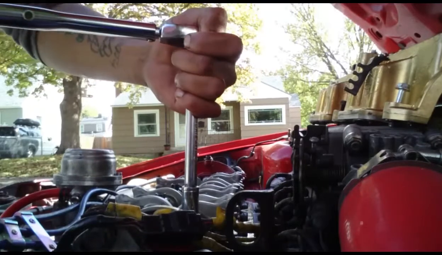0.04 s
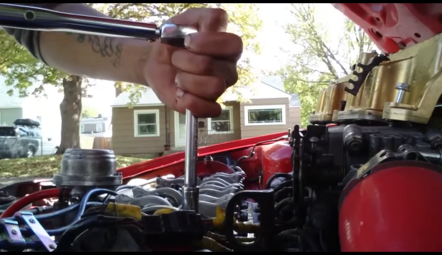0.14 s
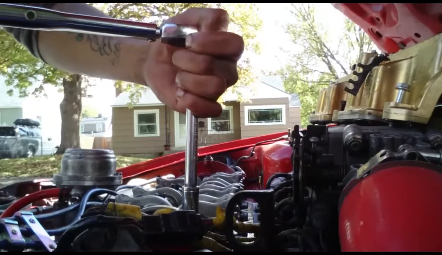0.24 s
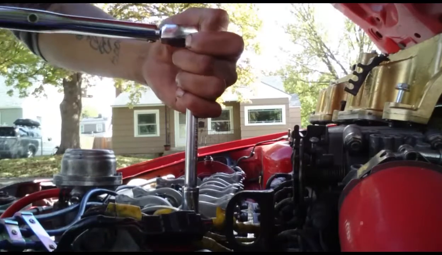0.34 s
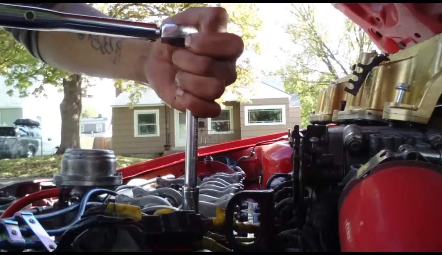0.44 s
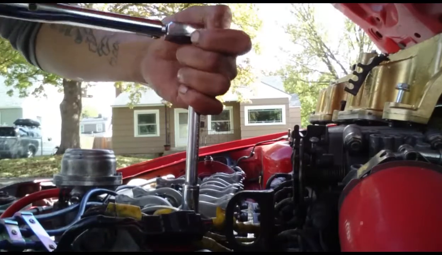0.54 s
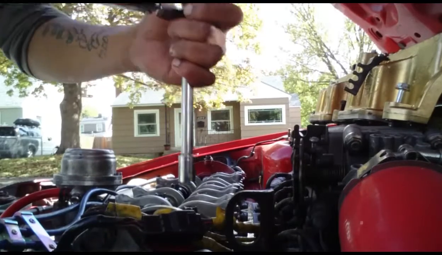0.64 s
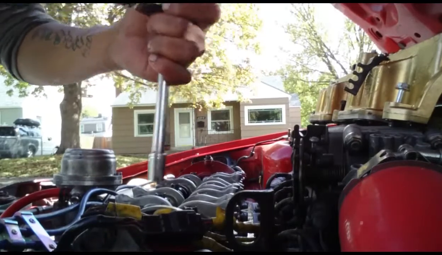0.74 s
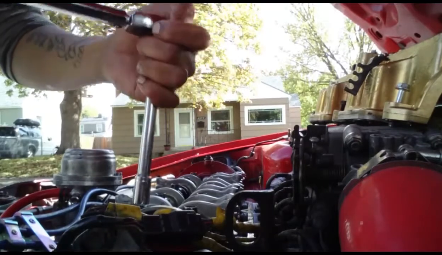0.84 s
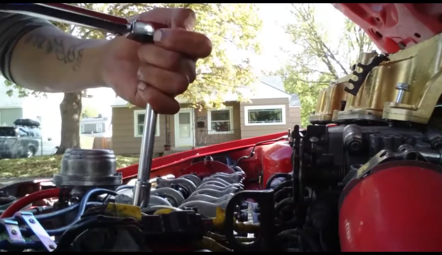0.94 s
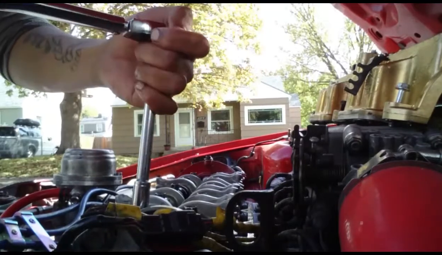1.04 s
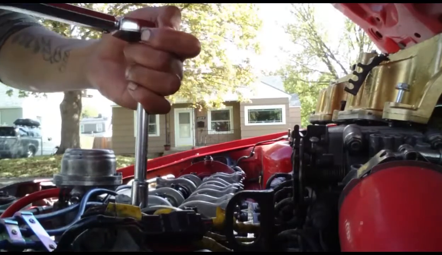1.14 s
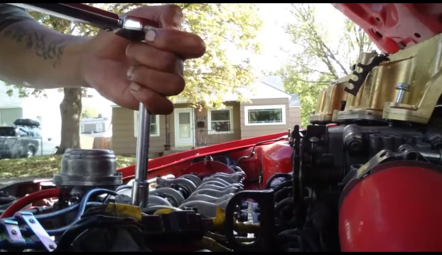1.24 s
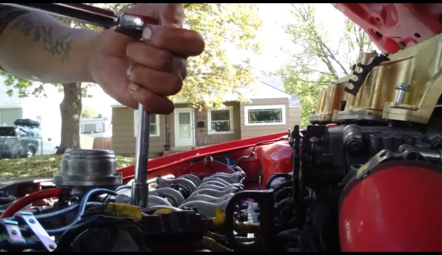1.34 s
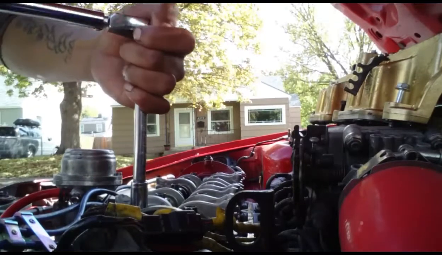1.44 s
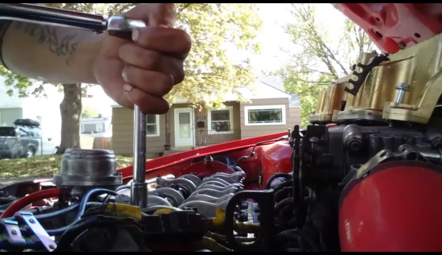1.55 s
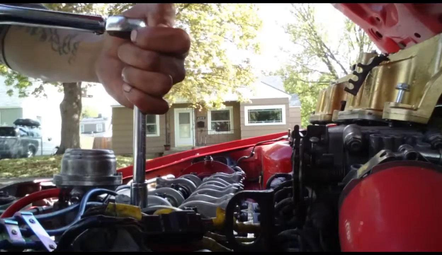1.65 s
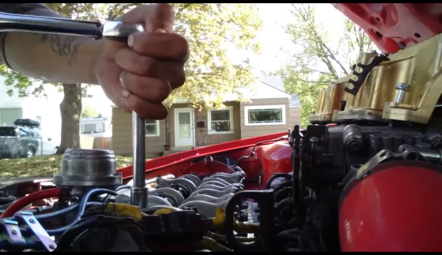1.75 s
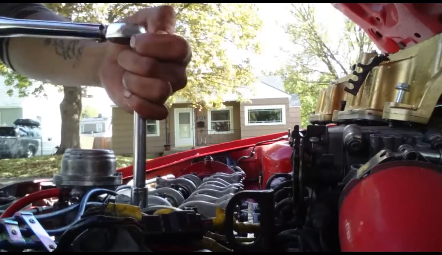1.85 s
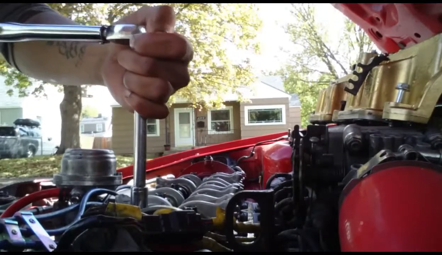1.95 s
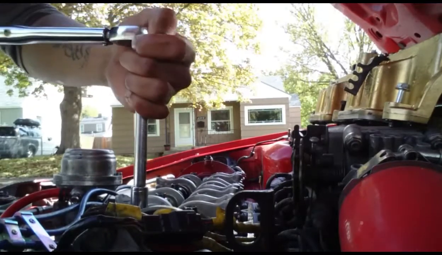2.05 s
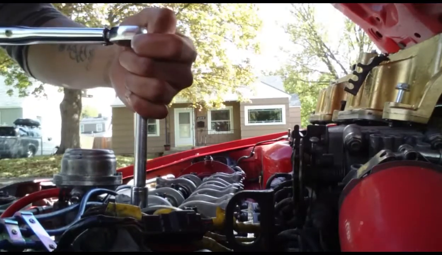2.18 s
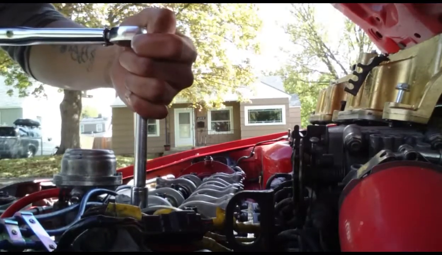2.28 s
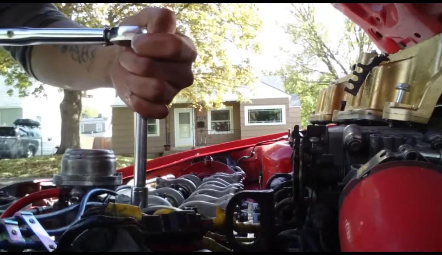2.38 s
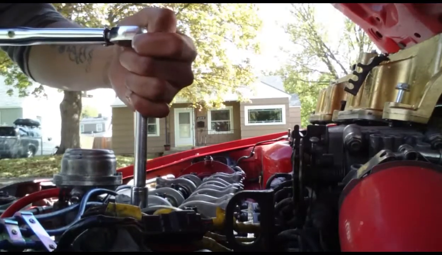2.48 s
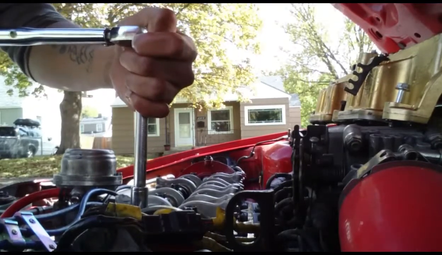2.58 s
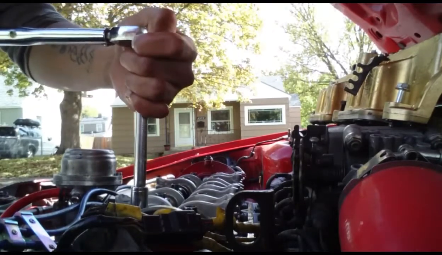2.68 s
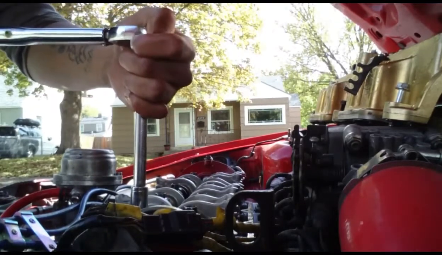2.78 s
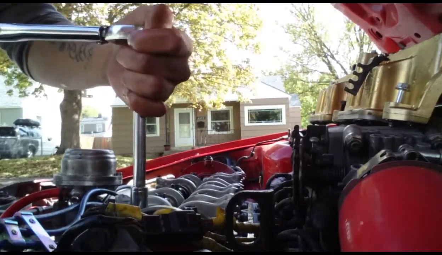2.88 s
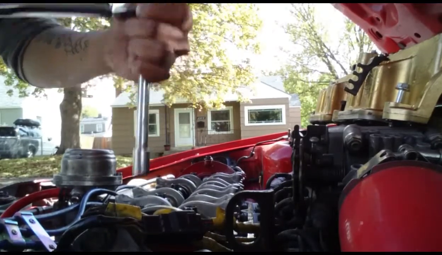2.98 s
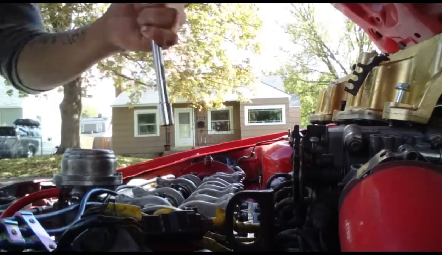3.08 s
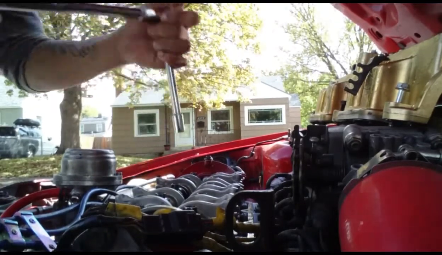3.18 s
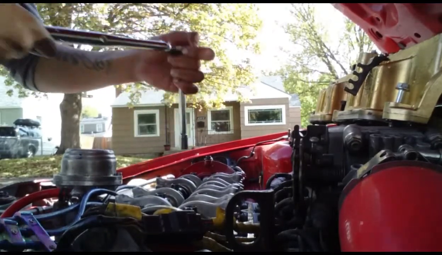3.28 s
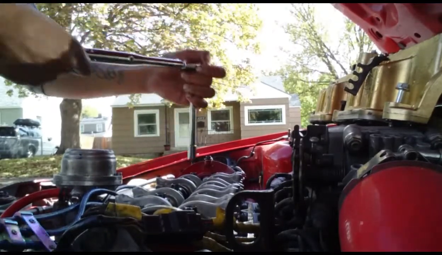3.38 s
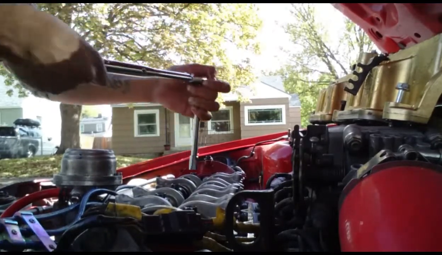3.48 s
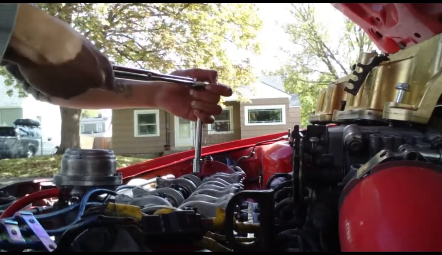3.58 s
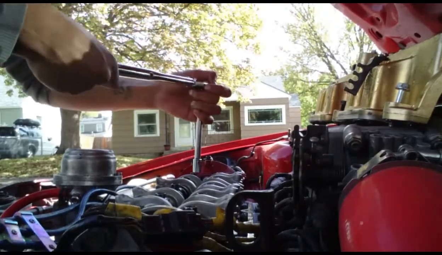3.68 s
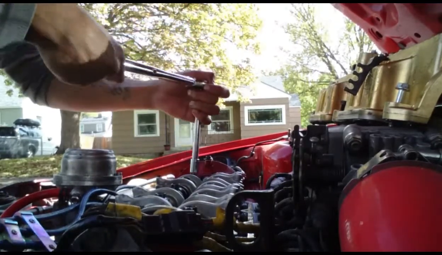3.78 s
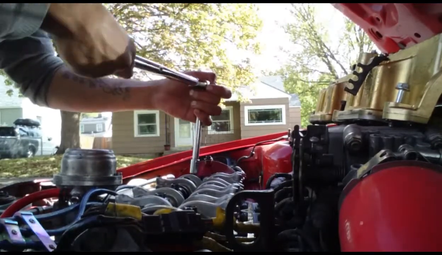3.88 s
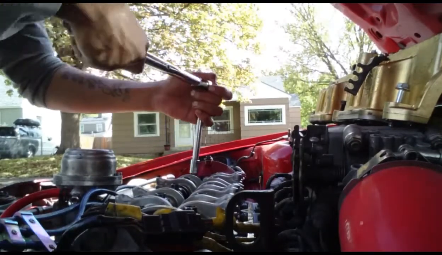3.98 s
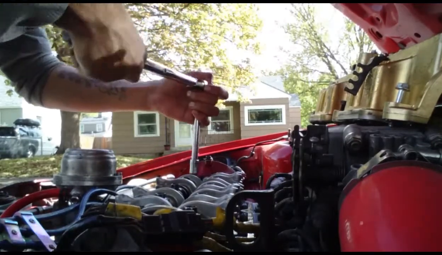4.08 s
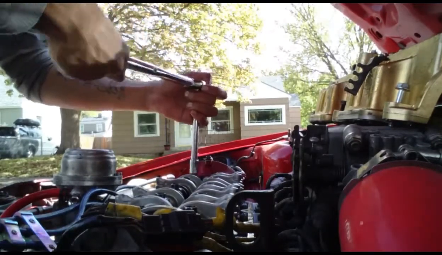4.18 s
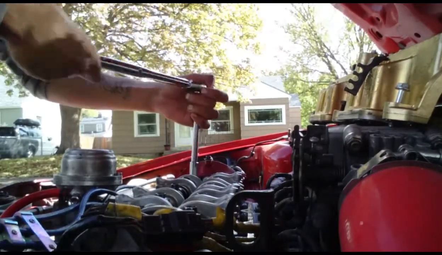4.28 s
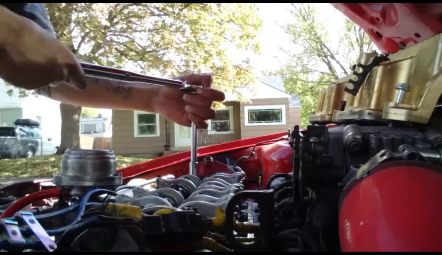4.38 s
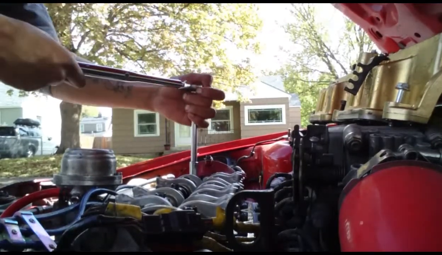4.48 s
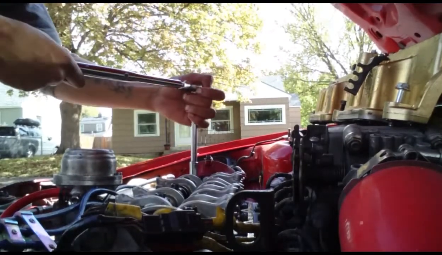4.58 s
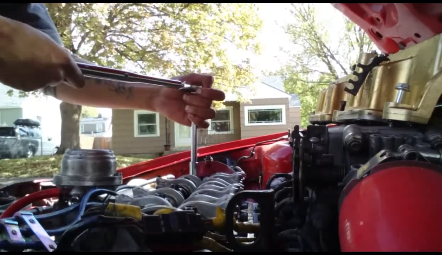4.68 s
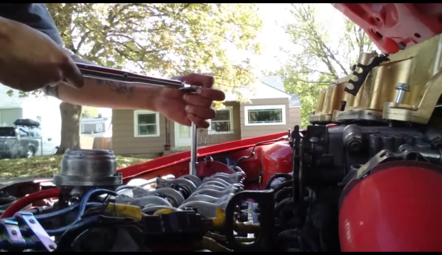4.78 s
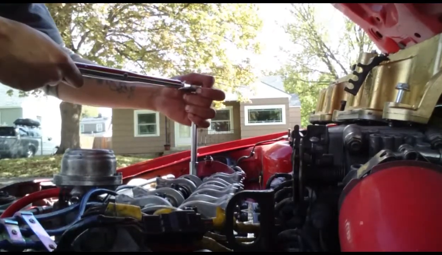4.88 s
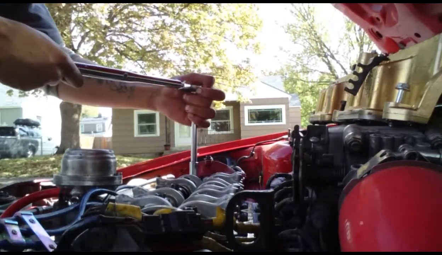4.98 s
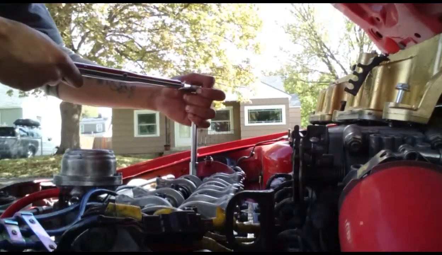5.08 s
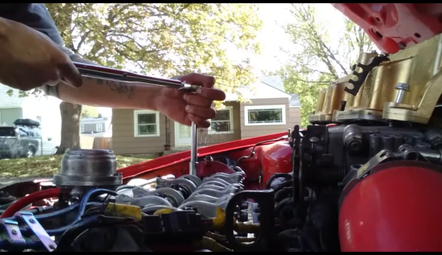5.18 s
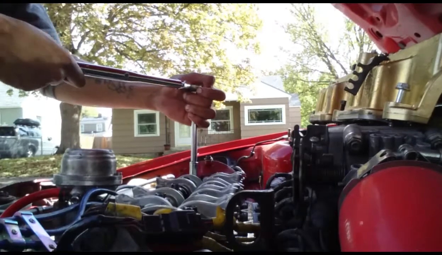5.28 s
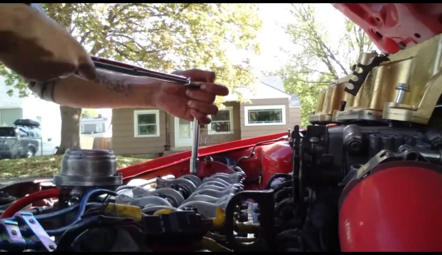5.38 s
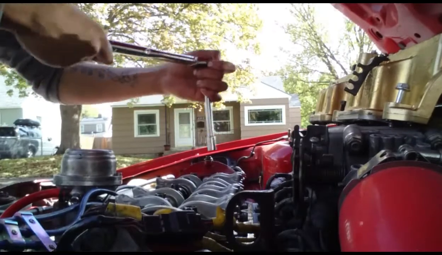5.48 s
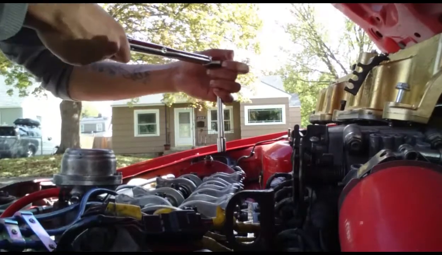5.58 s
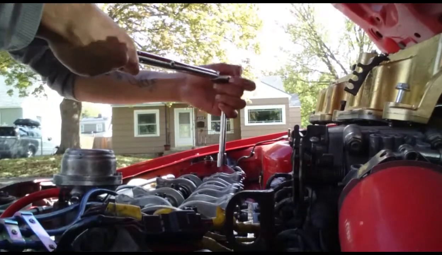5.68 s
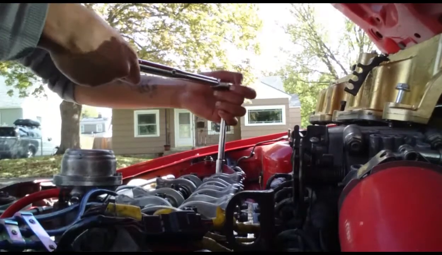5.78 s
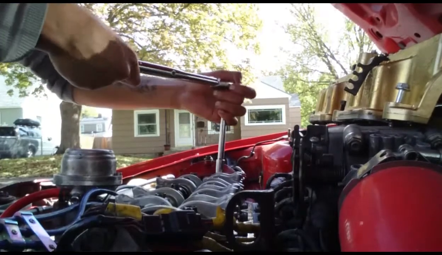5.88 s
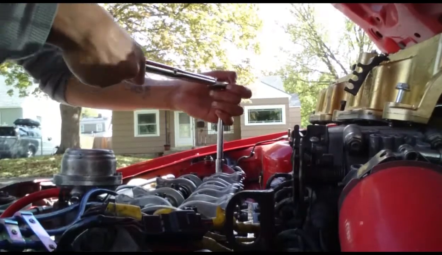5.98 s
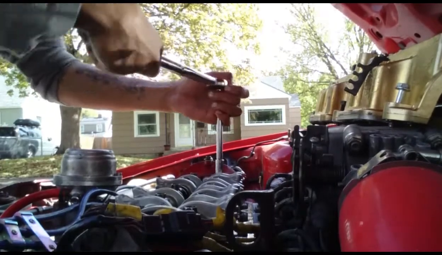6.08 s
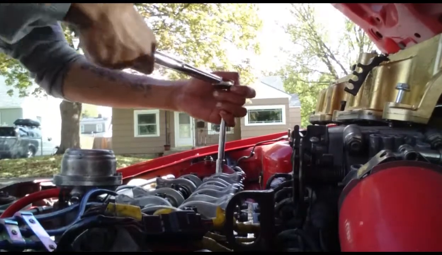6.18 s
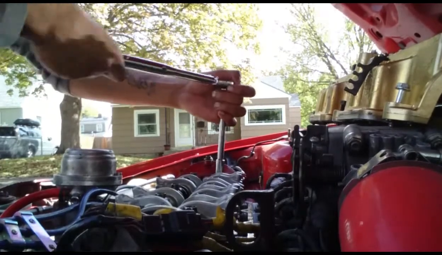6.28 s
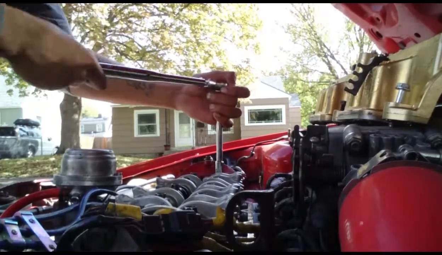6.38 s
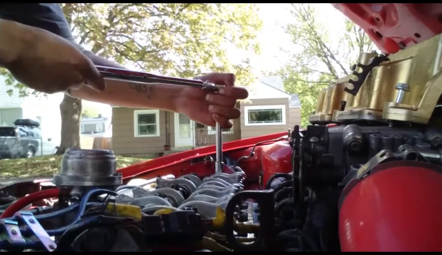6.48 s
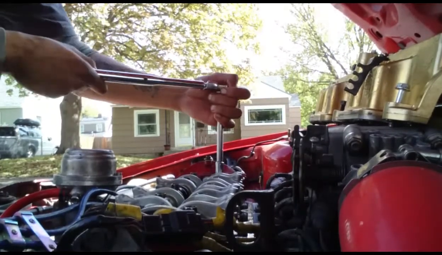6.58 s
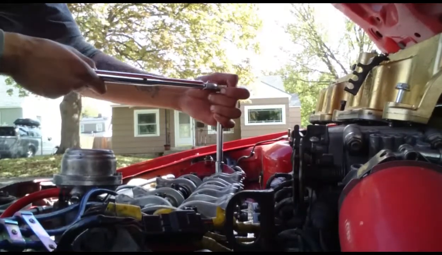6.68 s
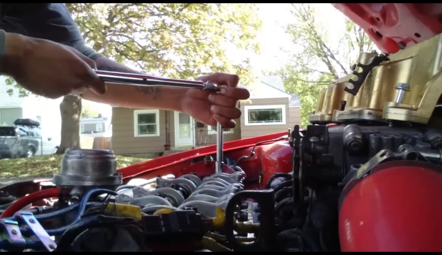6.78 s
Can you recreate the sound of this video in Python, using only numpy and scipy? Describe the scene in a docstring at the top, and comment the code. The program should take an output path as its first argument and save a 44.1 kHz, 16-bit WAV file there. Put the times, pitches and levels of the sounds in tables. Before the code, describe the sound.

Close stereo sound at an open engine bay outdoors, over a quiet bed of steady air and leaves, low rumble, faint hiss and distant traffic that swells gently around 1.3 and 3.7 seconds, then fades. At 0.3 a torque wrench breaks over with the loudest click, hard and bright with a short low thump, and snaps back at 0.5. Tiny loose ticks follow at 0.6; the socket knocks lightly at 0.95 and, duller, at 1.75. A second click pair comes at 2.6 and 2.85, the first with a brief socket ring, then small ticks. Knocks at 3.6 and 3.95 lead to a strong, sharp one at 4.3 with ringing bar. The third pair, somewhat softer, lands at 5.2 and 5.35, the last ringing clearer around the bar's pitch. Faint ticks, a knock at 5.8 and barely audible touches until 6.5 finish it, ending near 6.8.

```python
"""Under the open hood of a car parked outdoors, head bolts are tightened with a click-type torque wrench.
The wrench breaks over and snaps back, the socket knocks onto the next bolt and loose parts tick.
Each steel contact is a burst of shaped noise that scatters round the engine bay, plus decaying sines for
the extension bar and the socket; short low thumps, also decaying sines, lie under some blows.
Behind it, coloured noises make distant traffic, rumble, steady air and leaves, and microphone hiss."""
import sys
import numpy as np
from scipy import signal
from scipy.fft import rfft, irfft
from scipy.io import wavfile
from scipy.ndimage import uniform_filter1d

SR = 44100
rng = np.random.default_rng(int(sys.argv[2]) if len(sys.argv) > 2 else 0)


def wav_out(sig):
    """Save sig, one row per channel (or a flat mono array), as 16-bit PCM at SR to the path in sys.argv[1]."""
    wavfile.write(sys.argv[1], SR, np.round(np.clip(np.atleast_2d(sig).T, -1, 1) * 32767).astype(np.int16))


N = 301624   # length of the scene in samples
SPAN = 2 ** 15   # samples that one contact lasts
AGE = np.arange(SPAN) / SR   # seconds since the contact
BINS = np.fft.rfftfreq(SPAN, 1 / SR)   # Hz


def from_db(db):
    """Decibels to gain."""
    return 10 ** (np.asarray(db) / 20)


def rms_one(x):
    """Scale to unit rms."""
    return x / np.sqrt(np.mean(x ** 2) + 1e-20)


def at_hz(points, hz):
    """Read every column of a spectrum on a log-frequency axis."""
    knots, *columns = np.transpose(points)
    return np.array([np.interp(np.log(hz + 1), np.log(knots), column) for column in columns])


def fade(t60, hold=0):
    """Full strength while held, then an exponential decay of 60 dB in t60 seconds."""
    return np.exp(-np.log(1000) * np.maximum(AGE - hold, 0) / t60)


def add(out, s, sound):
    """Mix a sound in at time s."""
    start = max(round(s * SR), 0)
    out[:, start:start + SPAN] += sound[..., :N - start]


def pair(mid, side, likeness):
    """Left and right signals that are alike to the given degree (1 same, 0 unrelated, -1 opposite)."""
    c = np.clip(likeness, -.99, .99)
    shared = np.sqrt((1 + c) / 2) * mid
    opposed = np.sqrt((1 - c) / 2) * side
    return shared + opposed * np.array([[1], [-1]])


# Stereo tilt of the outdoors. Each row: frequency in Hz, left minus right in dB.
AIR_BALANCE = [(60, -8), (180, -1), (520, -7), (1520, -1.5), (4480, -0.5), (13200, -15)]
# Stereo width of the outdoors. Each row: frequency in Hz, left-right likeness from -1 to 1.
AIR_LIKENESS = [(60, 1), (180, 0.41), (520, 0.26), (1520, -0.18), (4480, 0.19), (13200, -0.1)]


def ambient(spectrum):
    """Steady stereo noise of the given colour, most alike in the bass; rms 1."""
    hz = np.fft.rfftfreq(N, 1 / SR)
    both = pair(*rfft(rng.standard_normal((2, N))), at_hz(AIR_LIKENESS, hz))
    colour_db = at_hz(spectrum, hz) + at_hz(AIR_BALANCE, hz) * np.array([[.5], [-.5]])
    return rms_one(irfft(both * from_db(colour_db), N))


def swelling(curve, colour):
    """Ambient noise of one colour that follows a level curve."""
    level_db = np.interp(np.arange(N) / SR, *np.transpose(curve))
    return from_db(level_db) * ambient(colour)


# Swell of the distant traffic. Each row: time in seconds, level in dB before the trim.
TRAFFIC = [(0.0, -72), (1.33, -62), (2.57, -68), (2.74, -64), (3.73, -61.5), (4.53, -64.5), (5.01, -74),
           (5.31, -68.5), (6.84, -81.5)]
# Colour of the traffic. Each row: frequency in Hz, relative level in dB.
TRAFFIC_COLOUR = [(200, -15.5), (400, -9), (600, -2), (1000, 0), (1400, -6.5), (2500, -14.5), (5000, -30.5)]
# Swell of the outdoor rumble. Each row: time in seconds, level in dB before the trim.
RUMBLE = [(0, -62.5), (0.5, -62), (1.5, -63), (2.8, -59), (3.3, -62), (6.84, -66)]
# Colour of the rumble. Each row: frequency in Hz, relative level in dB.
RUMBLE_COLOUR = [(25, -29), (36, -22.5), (52, -7.5), (70, 0), (100, -4), (160, -9.5), (260, -15.5),
                 (450, -26), (1500, -47)]
# Level of the hiss, which rises after the loud clicks and sinks again.
# Each row: time in seconds, level in dB before the trim.
HISS = [(0.0, -76), (0.36, -77), (0.48, -67.5), (1.2, -76.5), (2.65, -78.5), (2.78, -73.5), (5.18, -77),
        (5.33, -73), (6.84, -77.5)]
# Colour of the hiss. Each row: frequency in Hz, relative level in dB.
HISS_COLOUR = [(4000, -26), (7500, -16.5), (9500, 3), (11500, 7), (13000, -7.5)]
# Colour of the steady air and leaves. Each row: frequency in Hz, relative level in dB.
AIR = [(100, -7), (420, -1.5), (1000, 1), (1500, -1), (3600, -2.5), (5500, -11), (7500, -20.5),
       (13000, -29)]
AIR_DB = -65   # rms level of the steady air


def neighbourhood(traffic_db=-1, rumble_db=0, hiss_db=3.5):
    """Far traffic and rumble swell over steady air; a faint hiss rises after the loud clicks and sinks again."""
    traffic = from_db(traffic_db) * swelling(TRAFFIC, TRAFFIC_COLOUR)
    rumble = from_db(rumble_db) * swelling(RUMBLE, RUMBLE_COLOUR)
    hiss = from_db(hiss_db) * swelling(HISS, HISS_COLOUR)
    air = from_db(AIR_DB) * ambient(AIR)
    return traffic + rumble + hiss + air


# Short low thumps under some blows, one decaying sine to a row.
# Each row: start in seconds, level in dB before the stereo balance, frequency in Hz, t60 in seconds.
THUMPS = [(.319, -36, 98, 0.16), (0.317, -26, 130, 0.072), (.319, -23.5, 240, 0.023),
          (.319, -19, 400, 0.019), (0.317, -19.5, 534.5, .025), (.319, -22, 799.7, 0.023),
          (1.765, -36.5, 617, 0.031), (2.629, -48, 102.5, 0.13), (2.6, -47, 55, 0.32),
          (4.34, -51, 178, 0.36), (5.862, -50.5, 730, 0.1)]


def low_thumps(left_db=-12, right_db=3, rise_s=0.00036):
    """Short low thumps under some blows, heaviest at the first click and mostly on the right."""
    out = np.zeros((2, N))
    for s, db, hz, t60 in THUMPS:
        envelope = fade(t60) * (1 - np.exp(-AGE / rise_s))
        add(out, s, from_db(db) * envelope * np.sin(2 * np.pi * hz * AGE))
    return out * from_db([[left_db], [right_db]])


def coloured(x, gain):
    """Causal (minimum-phase) filter with the given gain at each frequency."""
    cepstrum = irfft(np.log(gain + 1e-9))
    # folding the cepstrum forward in time makes the filter causal
    cepstrum[..., 1:SPAN // 2] *= 2
    cepstrum[..., SPAN // 2 + 1:] = 0
    return irfft(rfft(x) * np.exp(rfft(cepstrum)))


def scatter(likeness):
    """The dense reflections of the engine bay, as stereo noise."""
    return pair(*rng.standard_normal((2, SPAN)), likeness)


# Short-lived resonances of the hand-damped wrench head.
# Each row: frequency in Hz, width in Hz, peak height in dB before the spread from blow to blow.
HEAD = [(2710, 70, 5), (2950, 80, 5), (3450, 60, 7), (3700, 70, 4), (3980, 70, 6), (4160, 70, 5),
        (4375, 60, 7), (4650, 60, 6), (5115, 65, 7), (6770, 70, 6), (7610, 65, 8), (8730, 55, 6),
        (8990, 60, 6), (10035, 55, 7), (10445, 60, 7), (11990, 90, 6)]


def head_db(spread=0.13):
    """The resonance peaks of the wrench head; each blow excites them in its own proportions."""
    total_db = 0
    for hz, width, db in HEAD:
        height_db = db * (1 + spread * rng.standard_normal())
        total_db = total_db + height_db / (1 + (2 * (BINS - hz) / width) ** 2)
    return total_db


def ripple_db(depth_db=1.67, size=70):
    """Reflections among the engine parts, as a smooth random ripple along each blow's spectrum."""
    ripple = rng.standard_normal(len(BINS))
    for _ in range(2):
        ripple = uniform_filter1d(ripple, size=size)
    return depth_db * rms_one(ripple)


# Colour of a contact at the two microphones.
# Each row: frequency in Hz, left relative level in dB, right relative level in dB.
STEEL = [(100, -39.5, -31), (412.4, -30.5, -27.5), (750, -36, -26), (1181, -17.5, -28),
         (2120, -20.5, -26.5), (3130, -19.5, -21), (3630, -15.5, -23), (4040, -10, -26), (4690, -15, -24.5),
         (6820, -28, -29.5), (8600, -23.5, -24), (9900, -25.5, -20), (11400, -24.5, -16.5),
         (13000, -33.5, -23)]
# How a contact builds and dies in each band.
# Each row: low edge in Hz, high edge in Hz, crack offset in dB, rise constant in seconds,
# t60 of the chatter in seconds, echo offset in dB.
BANDS = [(20, 980, -3, 0.0026, 0.07, 10), (909.7, 2000, -5.5, 0.0045, 0.062, 3),
         (2012, 3200, 3, .0007, 0.052, 4), (3740, 7900, 1, .0006, 0.049, -5),
         (6300, 35000, 1, 0.0012, 0.032, -9)]


def contact(chatter_s, first_db, bass_db, treble_db, bay_db, crack_t60=0.0075, bay_t60=0.35,
            bass_hz=1700, treble_hz=6000, grain_db=2, left_lead_s=.00033):
    """A hard crack, a few milliseconds of steel chattering on steel, then the dying scatter of the engine bay."""
    wander = rms_one(uniform_filter1d(rng.standard_normal(SPAN), size=50))
    grain = from_db(grain_db * wander)   # the chatter is uneven in strength
    noises = rfft([scatter(likeness=0.56), scatter(likeness=.2)])
    blow = 0
    for low_hz, high_hz, crack_db, rise_s, t60, echo_db in BANDS:   # the chatter lasts longer in the lows
        too_high = 1 + (BINS / high_hz) ** 10
        too_low = 1 + (low_hz / (BINS + 1)) ** 10
        near, far = irfft(noises / np.sqrt(too_high * too_low))
        crack = from_db(first_db + crack_db) * fade(crack_t60)
        chatter = grain * fade(t60, chatter_s)
        bay = far * from_db(bay_db + echo_db) * fade(bay_t60)
        blow = blow + (near * (crack + chatter) + bay) * (1 - np.exp(-AGE / rise_s))
    blow[1] = np.interp(AGE - left_lead_s, AGE, blow[1], left=0)   # the right microphone is farther away
    bass_shelf = bass_db / (1 + (BINS / bass_hz) ** 4)
    treble_shelf = treble_db * (1 - 1 / (1 + (BINS / treble_hz) ** 8))
    colour_db = at_hz(STEEL, BINS) + bass_shelf + treble_shelf + head_db() + ripple_db()
    return rms_one(coloured(blow, from_db(colour_db)))


def ring(modes, spread_db, phase_spread=0.94):
    """Struck steel: every blow shares its force differently among the modes, and each mode radiates its own way."""
    out = 0
    for hz, db, t60, pan_db in modes:
        phase = phase_spread * rng.standard_normal((2, 1))   # radians, one for each microphone
        balance_db = np.array([[pan_db / 2], [-pan_db / 2]])
        gain = from_db(db + spread_db * rng.standard_normal() + balance_db)
        out = out + gain * fade(t60) * np.sin(2 * np.pi * hz * AGE + phase)
    return out


# Modes of the extension bar and wrench shaft.
# Each row: frequency in Hz, relative level in dB, t60 in seconds, left minus right in dB.
BAR = [(1351, 0, .34, -7), (1384, -8, .3, 0), (1895, -8, .22, 10), (2616, -18, .25, 0), (2864, -4, .13, 5),
       (3210, -3, .13, 0), (4657, -17, .28, 2)]
# Modes of the socket.
# Each row: frequency in Hz, relative level in dB, t60 in seconds, left minus right in dB.
SOCKET = [(3402, -9, .23, 3), (4280, -13, .25, 4), (5464, -1, .28, 8), (6013, -3.5, .36, 4),
          (7434, -12, .42, 4), (7650, -12, .32, 4), (10200, -20, .35, -2)]


def strike(chatter_s, first_db, bass_db, treble_db, bay_db, bar_db, socket_db, pan_db, contact_db=-12.0):
    """Every contact cracks and leaves the bar and the socket ringing."""
    crack_gain = from_db(contact_db + treble_db / 2)   # a brighter crack is also louder
    crack = crack_gain * contact(chatter_s, first_db, bass_db, treble_db, bay_db)
    bar = from_db(bar_db) * ring(BAR, spread_db=3)
    socket = from_db(socket_db) * ring(SOCKET, spread_db=1.5)
    return (crack + bar + socket) * from_db([[pan_db / 2], [-pan_db / 2]])


# Rows come in pairs: the wrench breaks over, then snaps back about 0.2 s later.
# Each row: start in seconds, relative level in dB, chatter in seconds, first crack in dB, treble in dB,
# left minus right in dB, bar ring in dB, socket ring in dB (the rings relative to the row's level).
CLICKS = [(0.319, -18.5, 0.0039, 19, 12, 0.5, -35.5, -43), (0.508, -21, 0.0026, 19, 2, -3.5, -37.5, -46),
          (2.6286, -20.5, .0045, 14, -1.5, -0.5, -33.5, -23),
          (2.8578, -23.5, 0.0017, 8.5, -1, -3, -26.5, -43),
          (5.173, -24, 0.0041, 2.5, 3.5, -3, -31.5, -25.5),
          (5.355, -25.5, 0.0041, 6, 0.5, -0.5, -15.5, -45.5)]


def wrench():
    """The loud, dry clicks of the torque mechanism."""
    out = np.zeros((2, N))
    for s, db, chatter_s, first_db, treble_db, pan_db, bar_db, socket_db in CLICKS:
        click = strike(chatter_s, first_db, bass_db=0.4, treble_db=treble_db, bay_db=-28.5,
                       bar_db=bar_db, socket_db=socket_db, pan_db=pan_db)
        add(out, s, from_db(db) * click)
    return out


# Loose play in the ratchet and socket as the tool is handled.
# Each row: start in seconds, relative level in dB, chatter in seconds, bass in dB.
TICKS = [(0.6209, -47.5, 0.0031, 5.5), (0.6414, -57.5, .002, 12.5), (1.351, -59, .001, 0.5),
         (1.743, -49.5, .002, 7), (2.976, -48, 0.0042, 6), (2.997, -53.5, .0028, 9), (3.218, -57, .003, -2),
         (4.319, -43.5, .0011, -2), (5.429, -48.5, .0032, 11), (5.462, -46.5, 0.0025, 2),
         (5.865, -53, 0.011, 14), (6.227, -61, 0.0034, 14), (6.482, -60, 0.01, 3.5),
         (6.492, -52, .0055, 14.5)]


def handling():
    """Light touches are duller than the clicks and leave little ring."""
    out = np.zeros((2, N))
    for s, db, chatter_s, bass_db in TICKS:
        tick = strike(chatter_s, first_db=5.5, bass_db=bass_db, treble_db=-5.5, bay_db=-21,
                      bar_db=-33, socket_db=-43, pan_db=-4.5)
        add(out, s, from_db(db) * tick)
    return out


# The socket knocks onto a bolt or takes up its slack.
# Each row: start in seconds, relative level in dB, chatter in seconds, first crack in dB,
# bass in dB, treble in dB.
KNOCKS = [(0.953, -35.5, 0.0064, -16, -1.5, 6.5), (1.762, -39.5, 0.0027, 9.5, 12.5, -1.5),
          (3.6009, -37, 0.0054, -4.5, -12, -1.5), (3.9646, -34.5, 0.014, -5.5, -7, -2.5),
          (4.3259, -24, 0.0037, 10.5, 2.5, -1.5), (5.815, -31, 0.0072, -14.5, -10, 3)]
BAR_DB_PER_DB = 0.86   # a harder knock sets a larger share of the bar ringing


def socket_knocks(bar_db=-26.0):
    """Knocks on a bolt carry into the engine bay and ring the bar."""
    out = np.zeros((2, N))
    usual_db = np.mean([row[1] for row in KNOCKS])
    for s, db, chatter_s, first_db, bass_db, treble_db in KNOCKS:
        ring_db = bar_db + BAR_DB_PER_DB * (db - usual_db)
        knock = strike(chatter_s, first_db, bass_db, treble_db, bay_db=-22.5,
                       bar_db=ring_db, socket_db=-41, pan_db=-2.5)
        add(out, s, from_db(db) * knock)
    return out


def scene():
    """The outdoors, the low thumps and the tool at work."""
    return neighbourhood() + low_thumps() + wrench() + handling() + socket_knocks()


def record(dry, ceiling=.62, cutoff_hz=13100):
    """The hardest peaks are rounded and the top is cut steeply."""
    rounded = ceiling * np.tanh(dry / ceiling)
    steep_cut = signal.ellip(10, .3, 70, cutoff_hz, fs=SR, output="sos")   # 0.3 dB ripple, 70 dB stopband
    return signal.sosfilt(steep_cut, rounded)


dry = scene()
out = record(dry)
wav_out(out)
```